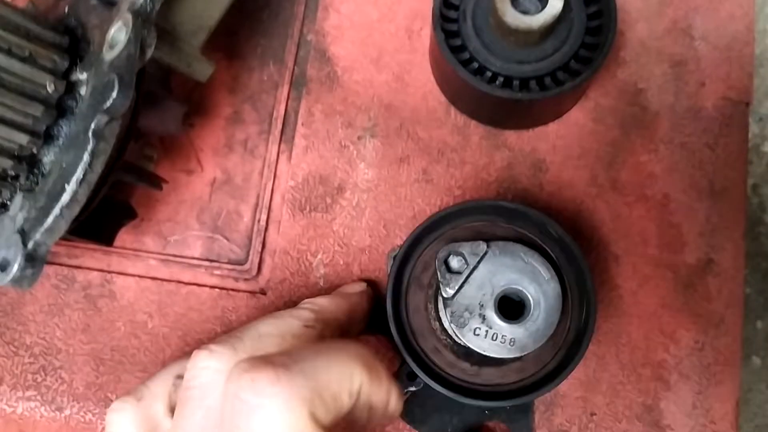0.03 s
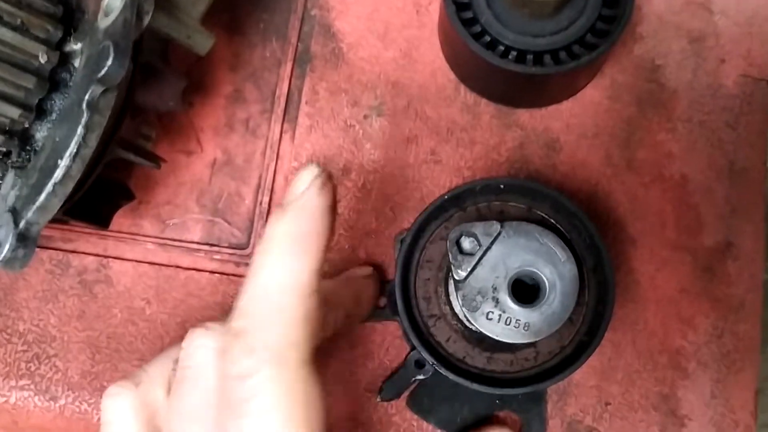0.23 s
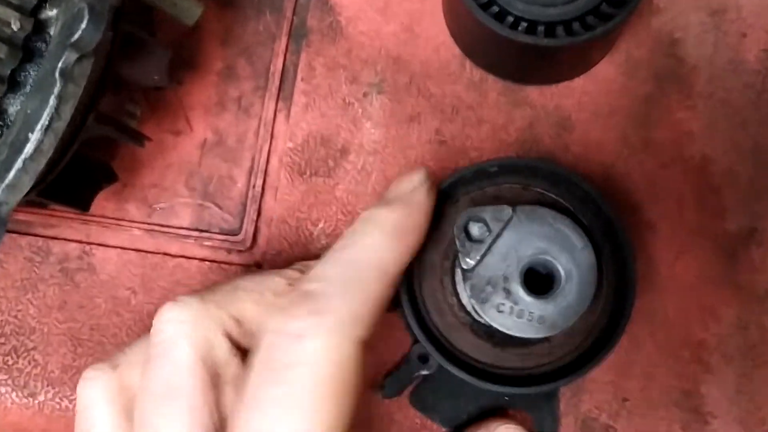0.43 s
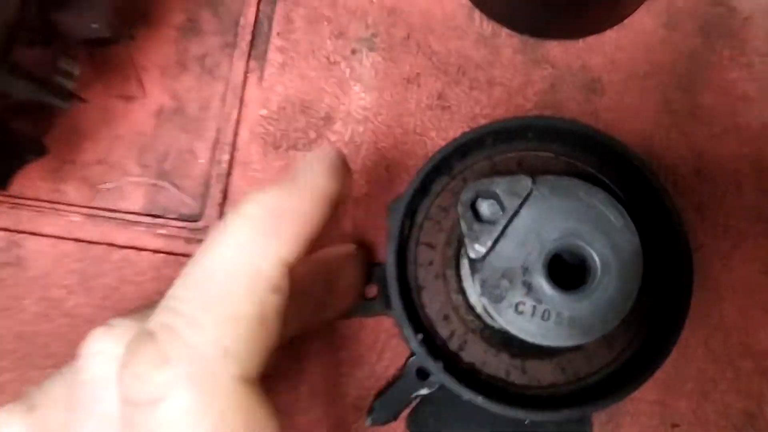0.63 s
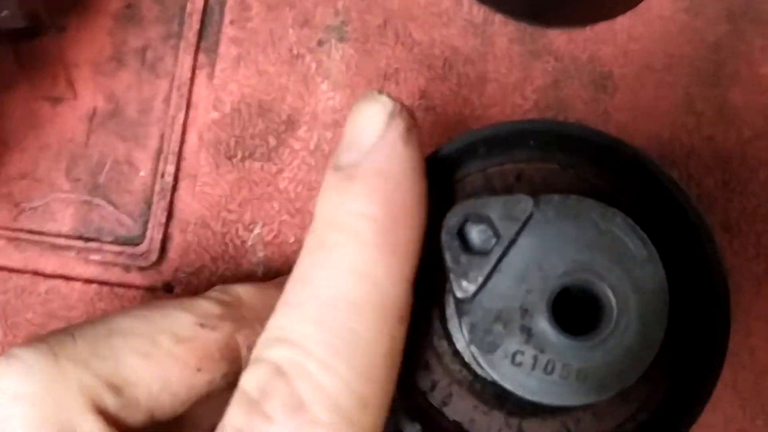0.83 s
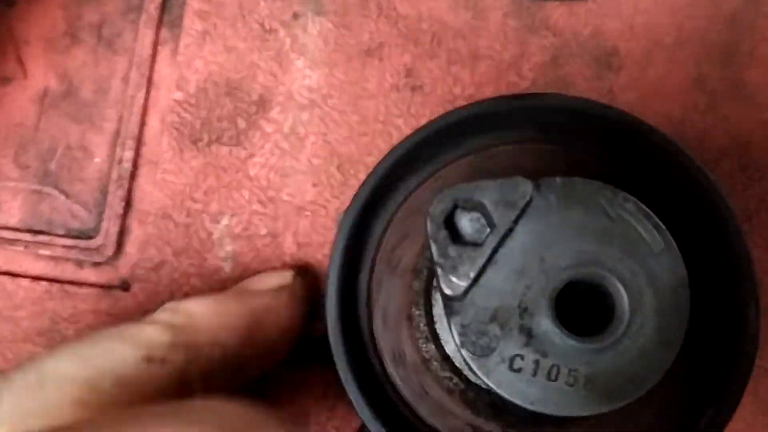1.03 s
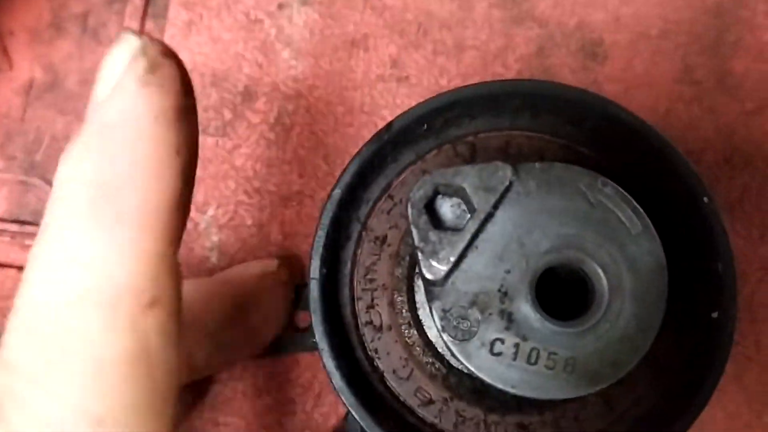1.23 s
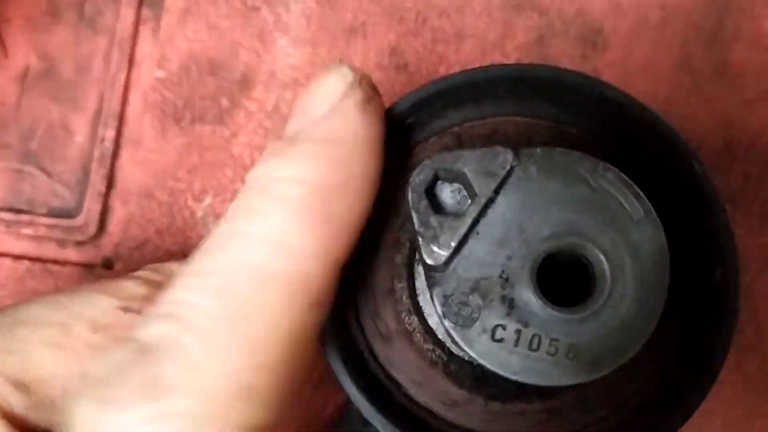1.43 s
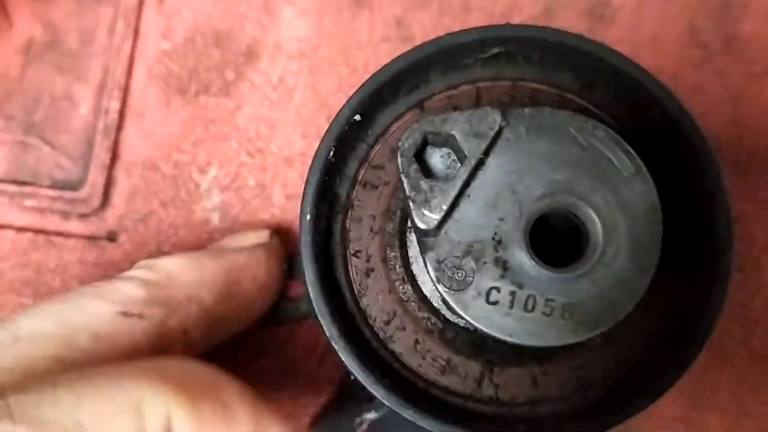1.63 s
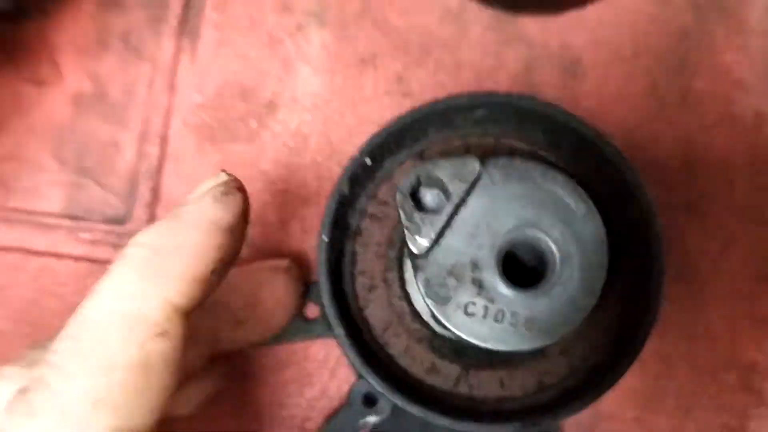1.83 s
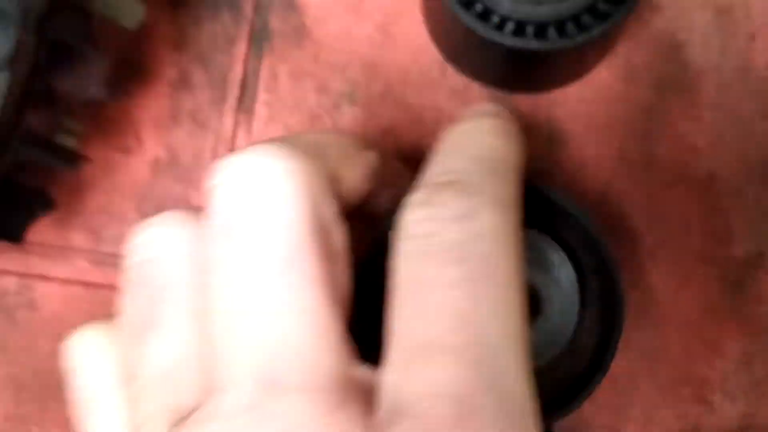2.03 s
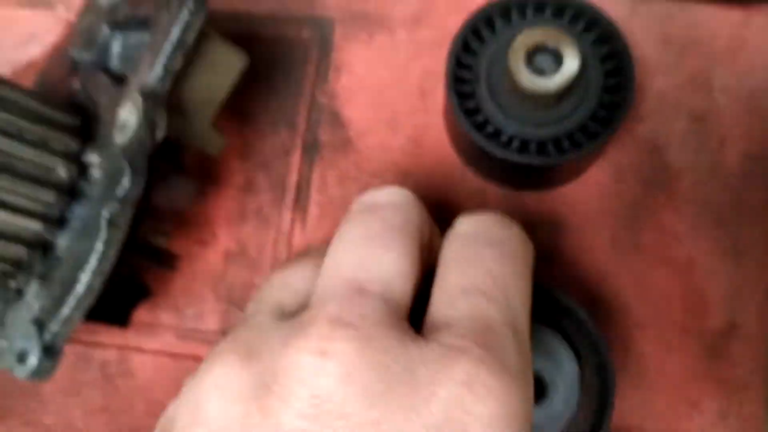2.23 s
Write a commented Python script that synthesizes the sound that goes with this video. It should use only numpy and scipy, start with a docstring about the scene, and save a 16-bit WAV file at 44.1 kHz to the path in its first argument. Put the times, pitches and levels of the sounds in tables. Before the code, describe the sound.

A small pulley clicks and knocks on a workbench as a finger flicks it, close up and slightly left. Sharp ticks with light knocks come at about 0.1, 0.55, 1.1 and 1.5 seconds, the first loudest, with faint rubbing on the plastic rim between. From 1.9 to 2.3 seconds a hand grips it with a brief scrape and clustered clicks. A quiet workshop hums behind, adding a short echo.

```python
"""A sharp tick of skin on plastic, close up: a finger flicks a small pulley round four times, then grips it.
Each touch is a puff of noise; sliding on the rim, the skin hisses and the rim drones.
The pulley rocks and knocks, ringing the workbench under it. A quiet workshop hums behind and adds
a short echo. Stereo microphones at the bench, the left one facing the hand."""
import sys
import numpy as np
from scipy import signal
from scipy.fft import rfft, irfft, next_fast_len
from scipy.io import wavfile
from scipy.ndimage import map_coordinates

SR = 44100
rng = np.random.default_rng(int(sys.argv[2]) if len(sys.argv) > 2 else 0)


def put_to_file(sound):
    """Save the sound as 16-bit audio at rate SR, in the file named by the first command-line argument."""
    columns = np.atleast_2d(sound).T  # one column per channel
    safe = np.clip(columns, -1, 1)
    whole_steps = np.round(safe * 32767)
    wavfile.write(sys.argv[1], SR, whole_steps.astype(np.int16))


N = 101341

# workshop background: (frequency [Hz], relative level [dB])
AIR_SPECTRUM = [(30, -30), (56, -3), (90, -12.5), (300, -22), (940, -24.5), (3000, -36.5), (16000, -46)]
# background and echo across the microphones: (frequency [Hz], left-right correlation)
AIR_LIKENESS = [(60, 0.9), (290, 0.9), (640, 0.52), (1400, -0.032)]
# workshop echo: (frequency [Hz], t60 [s])
ROOM_DECAY = [(200, 0.28), (3000, 0.19), (12000, 0.15)]
# the pulley rocking on the bench: (time [s], relative level [dB], centre [Hz])
PULLEY_KNOCKS = [(.025, -29.5, 1160), (0.039, -37.5, 308), (0.0997, -10.5, 940), (.102, -18, 260),
                 (0.107, -18.5, 660), (0.423, -38.5, 196), (0.433, -35.5, 524), (.547, -24, 740),
                 (.56, -22.5, 770), (0.576, -33.5, 365), (0.588, -31, 453), (.62, -37, 510),
                 (.815, -37, 2730), (.858, -43, 1600), (1.1, -30.5, 544), (1.109, -32.5, 470),
                 (1.125, -23, 870), (1.141, -31, 800), (1.1625, -30.5, 730), (1.202, -35, 755),
                 (1.238, -37.5, 468.6), (1.451, -28, 700), (1.456, -35, 139), (1.548, -38.5, 875),
                 (1.581, -22.5, 704), (1.608, -28.5, 765), (1.88, -32, 234), (1.893, -29.5, 272),
                 (1.941, -33, 1540), (1.98, -27, 1980), (2.231, -20, 1190), (2.239, -22.5, 308),
                 (2.245, -25.5, 330), (2.267, -27.5, 1420), (2.286, -33, 1500)]
# bench resonances: (frequency [Hz], relative level [dB], t60 [s])
BENCH_MODES = [(154.4, 6.5, 0.081), (202.6, 6, 0.064), (278, 7, 0.036), (336, -2.5, 0.073),
               (440, -6, 0.024), (615, 0.5, 0.034), (739, 0.5, 0.018), (859, 5.5, 0.016), (1240, 1.5, 0.02),
               (1528, 4.5, 0.02), (1640, 9.5, 0.0091), (2295, 5.5, 0.013), (3760, 3.5, 0.011)]
# knocks at the microphones: (frequency [Hz], left over right [dB])
KNOCK_BALANCE = [(100, 8), (380, -8), (1300, 8)]
# the hand's place at the microphones: (time [s], left over right [dB])
HAND_BALANCE = [(.6, 6), (.85, 3), (1.8, 3.5), (1.95, 5.5), (2.2, 12)]
# ticks and rubs across the microphones: (frequency [Hz], left-right correlation)
HAND_LIKENESS = [(300, 0.94), (640, 1), (1400, 0.081), (7000, 0.033)]
# bright friction hiss: (frequency [Hz], relative level [dB])
HISS_SPECTRUM = [(500, -54), (1200, 4.5), (4500, 3.5), (8500, 0), (9600, 6.5), (10700, -1), (14500, -2.5),
                 (15800, -2)]
# plastic rim resonances: (frequency [Hz], width [Hz], relative level [dB])
RIM_MODES = [(294, 124, 9), (975, 25, 13), (1500, 190, 9.5), (2110, 190, -0.5), (3750, 340, -4)]
# finger sliding on the rim: (start [s], rise [s], hold [s], t60 [s], hiss [dB], rim drone [dB])
FINGER_RUBS = [(0.078, 0.019, 0.02, 0.029, -36, -39.5), (0.414, 0.0028, 0.02, 0.12, -85, -57),
               (0.507, 0.041, 0.0033, 0.27, -52.5, -49), (0.977, 0.096, 0.033, 0.4, -59, -52),
               (1.538, 0.0077, 0.055, 0.044, -57, -64), (1.57, 0.028, 0.024, 0.15, -51.5, -53),
               (1.749, .012, 0.062, 0.24, -61.5, -60), (1.832, 0.01, 0.032, 0.65, -58, -55),
               (1.939, .018, 0.0058, 0.065, -54, -43.5), (2.007, 0.017, 0.044, 0.13, -94, -69),
               (2.088, 0.0064, 0.046, 0.097, -65, -99), (2.135, 0.033, 0.046, 0.023, -40, -36),
               (2.174, 0.071, 0.061, 0.12, -52, -50.5)]
# ticks at the rim: (time [s], relative level [dB], centre [Hz], t60 [s])
# the row at 1.447 s is a faint hiss leading into the sharp tick at 1.451 s
RIM_TICKS = [(0.0225, -24, 10700, 0.012), (0.035, -35.5, 4100, .025), (0.096, -17, 10100, 0.038),
             (0.117, -17.5, 9100, 0.0044), (0.417, -40.5, 7750, 0.0073), (.528, -24.5, 9500, 0.0054),
             (0.554, -24, 9800, 0.029), (0.558, -12, 5400, 0.0064), (0.812, -43.5, 7700, 0.032),
             (0.878, -42, 6400, 0.0075), (1.094, -24.5, 10100, 0.019), (1.0994, -30, 4660, 0.014),
             (1.447, -38, 9000, 0.017), (1.451, -14, 9100, 0.0075), (1.461, -37, 4770, 0.0076),
             (1.5827, -23.5, 8900, 0.016), (1.766, -35.5, 10000, 0.011), (1.778, -40.5, 9600, 0.05),
             (1.787, -42.5, 4400, 0.021), (1.844, -37.5, 5750, 0.02), (1.949, -34.5, 7300, 0.01),
             (1.98, -30, 6450, 0.01), (2.114, -38, 9200, 0.02), (2.188, -27, 3730, 0.012),
             (2.2013, -16, 3340, 0.012), (2.208, -23, 4800, 0.0071), (2.231, -34, 4380, 0.017),
             (2.239, -35, 5000, 0.016), (2.288, -47, 5000, 0.02)]

AIR_DB, ROOM_DB = -57.5, -9.5
KNOCK_DB, KNOCK_OCTAVES, SCATTER_DB = -6, 0.88, 3.5  # gain, spectral width, random spread per mode
CHATTER_S, CHATTER_DB = 0.0064, -3.5  # scales of the after-contacts' delay and level
CONTACT_CYCLES, BENCH_LOW_HZ = 0.11, 140  # contact softness; the bench radiates little below this
GRIT_DB, GRIT_PER_S = 2.5, 600
TICK_DB, TICK_OCTAVES, TICK_RISE_S = -13.5, 1.04, 0.0005
ECHO_DB, ECHO_T60_S = -28, 0.18  # a tick's echo off the bench
LOW_CUT_HZ, TOP_HZ = 23.7, 15900


def amp(db):
    return 10 ** (np.asarray(db) / 20)


def unit_rms(x):
    return x / np.sqrt(np.mean(x ** 2) + 1e-20)


def along(points, hz):
    """Interpolate (frequency [Hz], value) points on a log axis."""
    freqs, values = np.transpose(points)
    return np.interp(np.log(hz + 1), np.log(freqs + 1), values)


def wobble(rate):
    """A smooth random curve, rate knots a second."""
    knots = rng.standard_normal(int(N * rate / SR) + 4)
    return map_coordinates(knots, [np.arange(N) * rate / SR])


def filtered(x, response):
    """Apply a complex frequency response."""
    size = next_fast_len(x.shape[-1] + 2048)
    hz = np.fft.rfftfreq(size, 1 / SR)
    return irfft(rfft(x, size) * response(hz), size)[..., :x.shape[-1]]


def hiss(colour, likeness, size=N):
    """Stereo noise of rms 1 with a given spectrum and left-right correlation."""
    def mid_side_gains(hz):
        angle = np.arccos(np.clip(along(likeness, hz), -1, 1)) / 2
        return colour(hz) * [np.cos(angle), np.sin(angle)]
    mid, side = filtered(rng.standard_normal((2, size)), mid_side_gains)
    return unit_rms(np.array([mid + side, mid - side]))


def pan(db):
    """Left and right gains, db apart."""
    return amp(np.array([db / 2, -db / 2]))


def add(track, time, sound):
    """Mix a stereo sound in at a time in seconds."""
    part = track[:, round(time * SR):][:, :sound.shape[1]]
    part += sound[:, :part.shape[1]]


def workshop_air():
    """Low hum and hiss from the shop behind the bench."""
    return amp(AIR_DB) * hiss(lambda hz: amp(along(AIR_SPECTRUM, hz)), AIR_LIKENESS)


def workshop_echo(x):
    """The shop answers with a short diffuse tail, drawn anew every quarter second."""
    out, step = np.zeros((2, N)), SR // 4
    for start in range(0, N, step):
        noise = hiss(np.ones_like, AIR_LIKENESS, size=SR // 2)
        hz, t, spectra = signal.stft(noise, SR, nperseg=256)
        decay = amp(-60 * t / along(ROOM_DECAY, hz)[:, None])
        tail = signal.istft(spectra * decay, SR, nperseg=256)[1]
        piece = x[:, start:start + step].mean(axis=0, keepdims=True)
        add(out, start / SR + .004, signal.fftconvolve(piece, tail / np.linalg.norm(tail[0]), axes=1))
    return out


def pulley_knocks():
    """The rocking pulley rings the bench modes near each knock's centre, then chatters twice."""
    out, t = np.zeros((2, N)), np.arange(6144) / SR
    hz, mode_db, t60 = np.transpose(BENCH_MODES)
    mic_gains = pan(along(KNOCK_BALANCE, hz))
    for time, db, centre in PULLEY_KNOCKS:
        envelope = amp(-60 * t / t60[:, None]) * (1 - np.exp(-t * centre / CONTACT_CYCLES))
        rolloff = 1 + (np.log2(hz / centre) / KNOCK_OCTAVES) ** 2
        delays = CHATTER_S * np.array([0, rng.uniform(0.297, 0.6114), rng.uniform(0.696, 1.6)])
        for delay, contact_db in zip(delays, (0, CHATTER_DB, 3.2 * CHATTER_DB)):
            scatter, detune, skew = rng.standard_normal((3, len(hz)))
            gain = amp(mode_db + SCATTER_DB * scatter) / rolloff
            phase = 2 * np.pi * np.outer(hz * (1 + 0.046 * detune), t)
            lag = 0.96 * np.clip(hz / 1500, 0, 1) ** 2 * skew  # high modes reach the pair out of phase
            ring = np.array([(gain * mic) @ (envelope * np.sin(phase + side * lag[:, None]))
                             for mic, side in zip(mic_gains, (1, -1))])
            add(out, time + delay, -amp(db + KNOCK_DB + contact_db) * ring / np.linalg.norm(gain))
    return filtered(out, lambda f: 1j * f / (BENCH_LOW_HZ + 1j * f))


def hand_pan(time):
    """The hand is nearer the left microphone, so louder there."""
    return pan(np.interp(time, *np.transpose(HAND_BALANCE)))


def hiss_colour(hz):
    """Bright friction hiss with a narrow peak near 9.6 kHz."""
    return amp(along(HISS_SPECTRUM, hz))


def rim_colour(hz):
    """Each rim resonance passes a band of the friction noise."""
    return sum(amp(db) * abs(hz * width / (centre ** 2 - hz ** 2 + 1j * hz * width))
               for centre, width, db in RIM_MODES)


def finger_rubs():
    """Gritty friction: a bright hiss and a drone in the rim's resonances."""
    t = np.arange(N) / SR
    bright, rim = np.zeros((2, N))
    for start, rise, hold, t60, hiss_db, rim_db in FINGER_RUBS:
        swell = np.clip((t - start) / rise, 0, 1) ** 2
        fade = amp(-60 * np.clip(t - start - rise - hold, 0, 9) / t60)
        bright += amp(hiss_db) * swell * fade
        rim += amp(rim_db) * swell * fade
    grit = unit_rms(amp(GRIT_DB * wobble(GRIT_PER_S)))
    friction = grit * (bright * hiss(hiss_colour, HAND_LIKENESS) + rim * hiss(rim_colour, HAND_LIKENESS))
    lows = filtered(friction, lambda hz: 1 / (1 + (hz / 700) ** 4))  # these stay in the middle
    return lows + hand_pan(t) * (friction - lows)


def rim_ticks():
    """Each tick is a brief puff of bright noise, with a faint echo off the bench."""
    out, t = np.zeros((2, N)), np.arange(6144) / SR
    for time, db, centre, t60 in RIM_TICKS:
        colour = lambda hz: hiss_colour(hz) / (1 + (np.log2((hz + 1) / centre) / TICK_OCTAVES) ** 2) ** 2
        rise = TICK_RISE_S + 0.06 * t60  # long ticks start slower
        attack = 1 - np.exp(-t / rise)
        direct = amp(-60 * t / t60) * attack ** 2
        echo = amp(ECHO_DB - 60 * t / ECHO_T60_S) * attack
        puff = hiss(colour, HAND_LIKENESS, size=len(t)) * (direct / direct.max() + echo)
        add(out, time - rise / 2, amp(db + TICK_DB) * hand_pan(time)[:, None] * puff)
    return out


def scene():
    """Hand and pulley up close; behind them the shop's hum and its echo of the knocks and rubs."""
    near = pulley_knocks() + finger_rubs()
    return rim_ticks() + near + amp(ROOM_DB) * workshop_echo(near) + workshop_air()


def record(dry):
    """The microphones lose the deepest bass and everything above TOP_HZ."""
    def response(hz):
        s = 1j * hz / LOW_CUT_HZ
        low_cut = s ** 2 / (1 + 1.4 * s + s ** 2)
        return low_cut ** 2 * (hz < TOP_HZ)
    return filtered(dry, response)


dry = scene()
out = record(dry)
put_to_file(out)
```